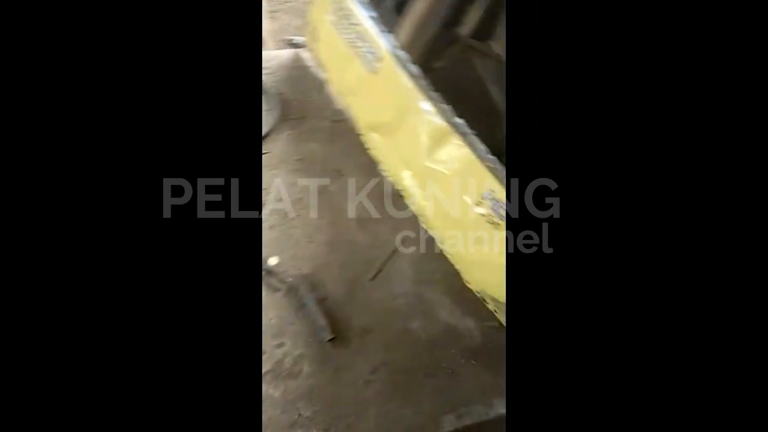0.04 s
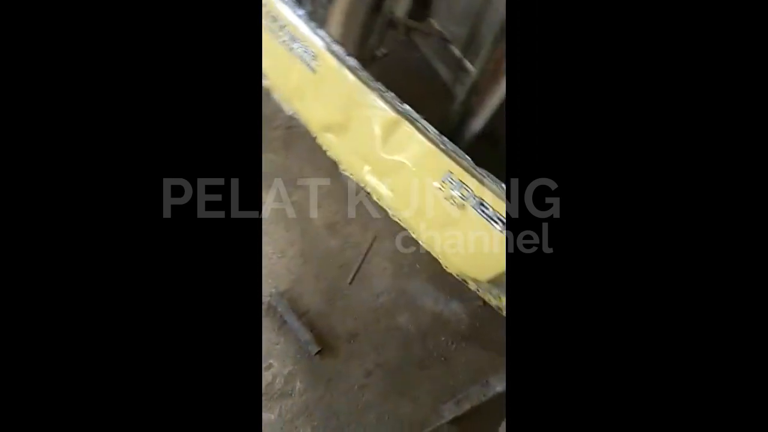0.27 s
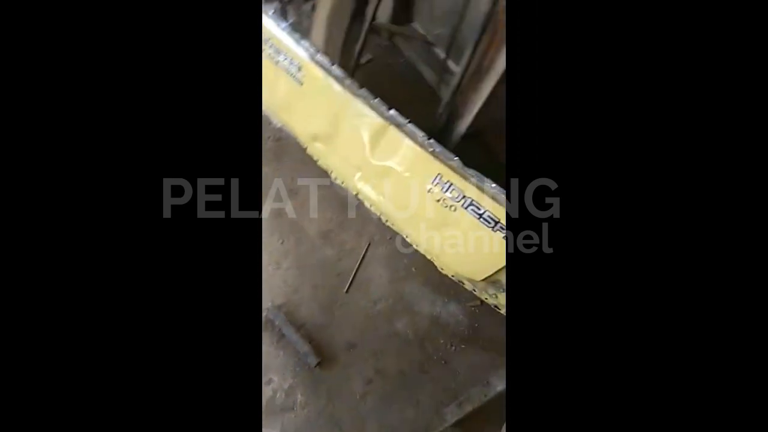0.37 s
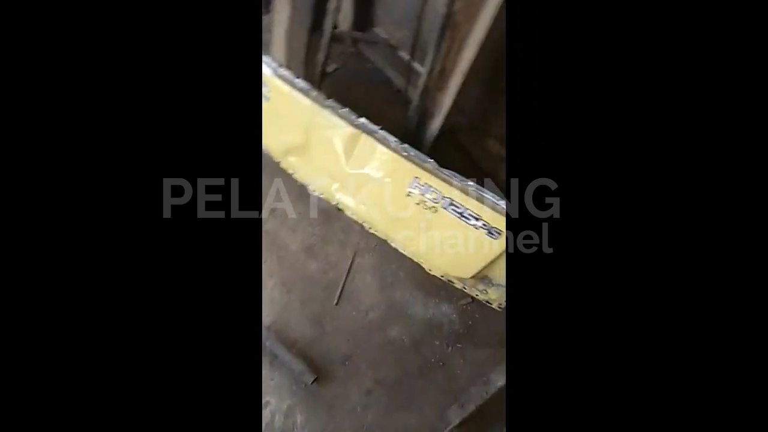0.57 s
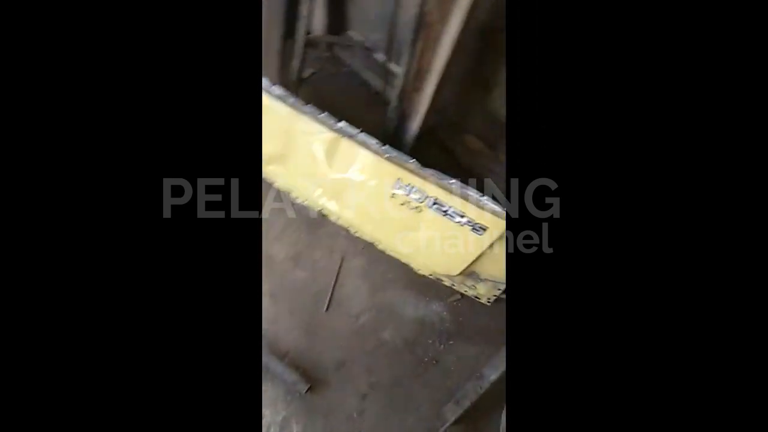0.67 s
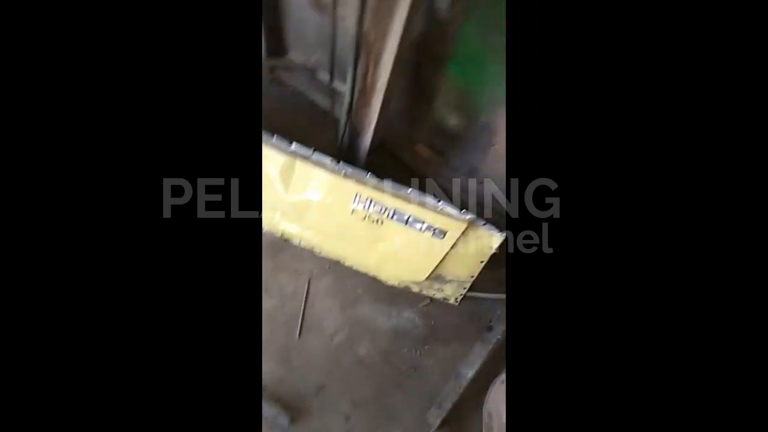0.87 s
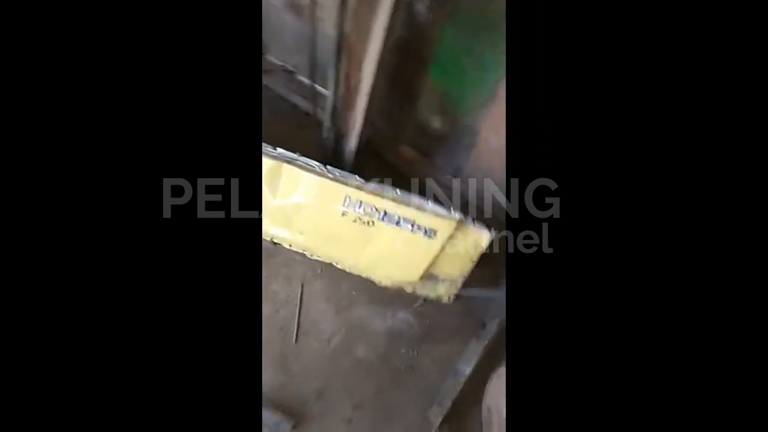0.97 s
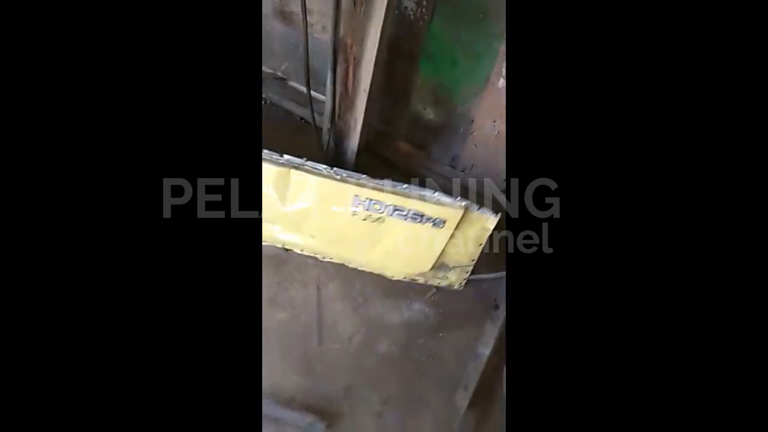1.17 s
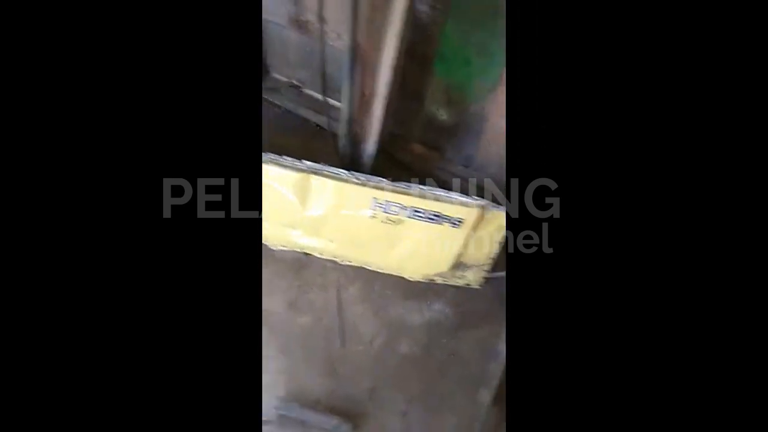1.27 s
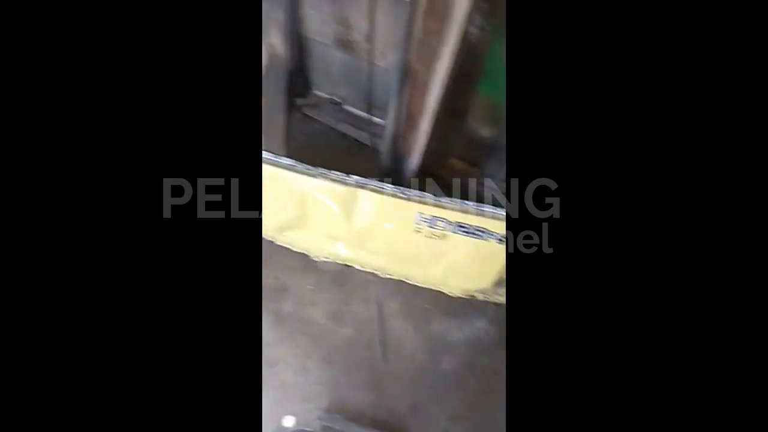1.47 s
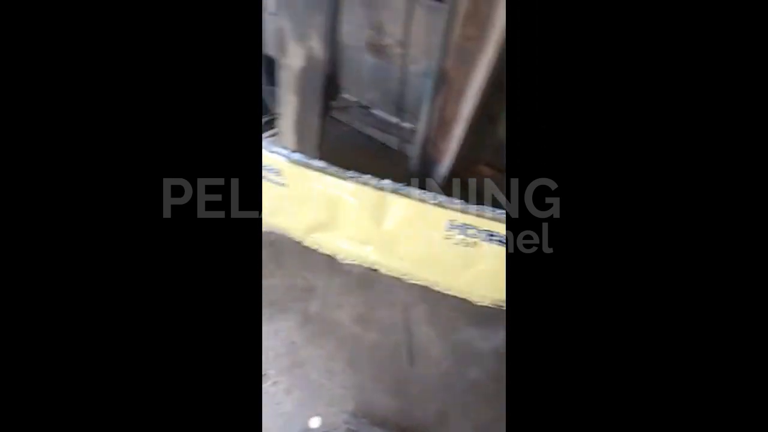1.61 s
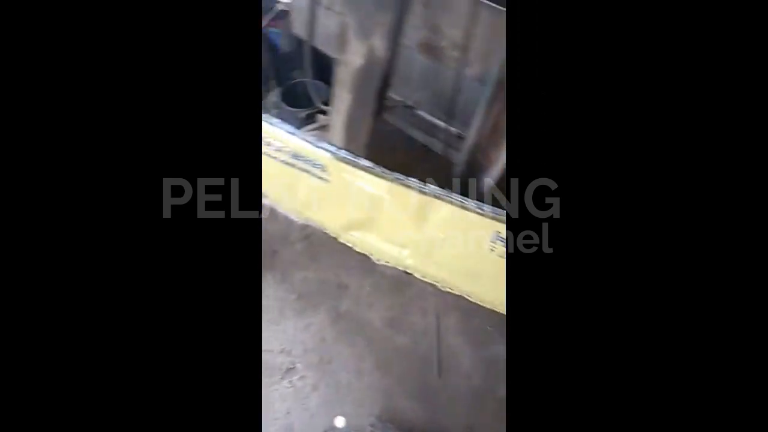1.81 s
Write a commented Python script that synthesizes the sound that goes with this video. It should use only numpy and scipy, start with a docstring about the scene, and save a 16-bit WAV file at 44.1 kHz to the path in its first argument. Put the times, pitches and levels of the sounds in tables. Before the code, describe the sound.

A hammer strikes a big steel truck panel four times at an even pace, heavy and lighter blows in turn, each a sharp crack with a boomy clang, close in a workshop, slightly overloaded microphone.

```python
"""A hammer beats a steel truck panel in a workshop, a heavy blow and a lighter one in turn.
At first an earlier heavy blow rings out, over air noise and a far motor of fading shaft harmonics. Blows follow
at 0.2, 0.6, 1.1 and 1.5 s: a noise-burst knock, a crash of noise bands that swell like crowded sheet modes, and
a boom of low sine modes; the heavy ones hold longer and have more treble. A thin noise-band whine swells
at 0.5 s and again from 1.15 s, two noise scuffs pass after 0.8 s, and a noisy gliding squeal enters at 1.4 s."""
import sys
import numpy as np
from scipy import signal
from scipy.fft import rfft, irfft
from scipy.io import wavfile

SR = 44100
rng = np.random.default_rng(int(sys.argv[2]) if len(sys.argv) > 2 else 0)


def put_to_file(sound):
    """Save the sound as 16-bit audio at rate SR, in the file named by the first command-line argument."""
    columns = np.atleast_2d(sound).T  # one column per channel
    safe = np.clip(columns, -1, 1)
    whole_steps = np.round(safe * 32767)
    wavfile.write(sys.argv[1], SR, whole_steps.astype(np.int16))


N = 81585

# hammer blows: t/s, level/dB, bass/dB, treble/dB, time the sheet keeps shaking/s, lightness (0-1),
# brightness limit f/Hz, knock level/dB
BLOWS = [(-.36, -6, -14, -4.5, 0.008, 0, 12500, -39.5), (.199, 1, 0.5, -4, 0.043, 0.02, 15150, -36),
         (0.593, -1.5, -1.5, -8, 0.0056, 1, 14500, -28.5), (1.104, 2, -0.5, -2.5, 0.032, 0, 15000, -21.5),
         (1.505, -3.5, 0, -15.5, 0.0071, 0.94, 12100, -30.5)]
BANDS_HZ = 31.25 * 2 ** (np.arange(28) / 3)  # third-octave centres
BASS_HZ, TREBLE_HZ, TREBLE_SLOPE = 334, 3353, 3.4  # where a blow's bass and treble columns take over
DIFFUSE_HZ = 570  # the highs reach the ears from all sides


def undb(db):
    """Decibels to gain."""
    return 10 ** (np.asarray(db) / 20)


def rms(x):
    """Root mean square of each channel."""
    return np.sqrt(np.mean(x ** 2, axis=-1, keepdims=True))


def unit(x):
    """Scale to rms 1."""
    return x / rms(x)


def at(table, hz):
    """The columns of a table at one frequency, interpolated over log frequency."""
    rows = np.array(table, float)
    return [np.interp(np.log(hz), np.log(rows[:, 0]), col) for col in rows.T[1:]]


def level(t, table):
    """Gain over time from a table of t/s and level/dB."""
    return undb(np.interp(t, *np.array(table).T))


def freqs():
    """Frequency axis in Hz, kept above zero."""
    return np.maximum(np.arange(N // 2 + 1) * SR / N, 1)


def noise(shape):
    """Two unrelated noises of rms 1 with the given gain over frequency."""
    return unit(irfft(rfft(rng.standard_normal((2, N))) * shape, N))


def third(hz):
    """Third-octave band that overlaps its neighbours."""
    return np.cos(np.pi / 2 * np.clip(3 * np.log2(freqs() / hz), -1, 1))


def peak(hz, width_hz):
    """Steep resonance, 12 dB down half a width from its centre."""
    return 1 / (1 + ((freqs() - hz) / width_hz * 2) ** 2) ** 2


def spread(pair, hz):
    """Mid and side to left and right: nearly alike in the bass, unrelated in the treble."""
    side = np.clip(0.016 + 1 / (1 + (DIFFUSE_HZ / hz) ** 3), 0, 1)
    mid_signal, side_signal = pair
    left_right = mid_signal + np.sqrt(side) * side_signal * np.array([[1], [-1]])
    return left_right / np.sqrt(1 + side)


def add(out, sound, start):
    """Mix a sound in from its start time; one that starts before zero is heard from its middle on."""
    i = int(round(start * SR))
    a, b = max(i, 0), min(N, N + i)
    out[:, a:b] += sound[:, a - i:b - i]


def air():
    """Quiet workshop background: steady noise, shaped band by band."""
    # background spectrum: f/Hz, level per third octave/dB
    floor = [(30, -92.5), (70, -91.5), (150, -91.5), (400, -92), (1000, -80.5), (3000, -93.5), (14000, -90)]
    return sum(undb(at(floor, hz)[0]) * spread(noise(third(hz)), hz) for hz in BANDS_HZ)


def motor(t):
    """Multiples of the shaft rate hum through the resonant housing of a far motor."""
    # motor loudness: t/s, level/dB
    motor_level = [(0, -56.5), (.18, -66.5), (.8, -74), (1.05, -77.5), (1.85, -76)]
    shaft_hz, body_hz, width_hz, low_db = 47.6, 387, 62, -20.5
    out = 0
    for hz in shaft_hz * np.arange(1, 14):
        housing = 1 / (1 + (2 * (hz - body_hz) / width_hz) ** 2)
        gain = housing + undb(low_db)  # a little of every harmonic gets past the resonance
        out = out + gain * np.sin(2 * np.pi * hz * t + rng.uniform(0, 2 * np.pi))
    return unit(out) * level(t, motor_level)


def whine(t):
    """A thin whistle: a narrow noise band that comes and goes."""
    # whine loudness: t/s, level/dB
    whine_level = [(0, -84), (.2, -85), (.5, -68.5), (.75, -68), (.95, -80.5), (1.15, -71), (1.42, -67.5),
                   (1.65, -78.5), (1.85, -83.5)]
    return level(t, whine_level) * noise(peak(4810, 220))


def squeal(t):
    """A high gliding tone, roughened into a narrow band by slow noise that multiplies it."""
    # squeal path: t/s, level/dB, f/Hz
    path = [(1.419, -89, 8300), (1.501, -61, 8560), (1.632, -65, 8460), (1.752, -82.5, 8570),
            (1.81, -63.5, 8200), (1.85, -64, 8180)]
    half_width_hz = 490
    times, db, hz = np.array(path).T
    phase = 2 * np.pi * np.cumsum(np.interp(t, times, hz)) / SR
    tone = np.sqrt(2) * np.sin(phase)
    gain = undb(np.interp(t, times, db)) * (t > times[0])
    return gain * tone * noise(peak(0, 2 * half_width_hz))


def scuffs(t):
    """Light scuffs: soft-edged puffs of broad high noise."""
    # scuffs: t/s, level/dB
    puffs = [(.828, -66), (.866, -68.5)]
    centre_hz, half_width_hz, length_s = 11100, 7100, 0.019
    out = np.zeros((2, N))
    for start, scuff_db in puffs:
        puff = np.exp(-((t - start) / length_s) ** 2)
        out += undb(scuff_db) * puff * noise(peak(centre_hz, 2 * half_width_hz))
    return out


def knocks(t):
    """The short, bright contact of hammer on steel that opens each blow."""
    knock_hz, knock_width_hz, knock_s = 1400, 130, 0.012
    tick_hz, tick_db = 3330, -11.5  # bright edge, relative to the knock
    out = np.zeros((2, N))
    env = t / knock_s * np.exp(1 - t / knock_s)
    for start, *_, knock_db in BLOWS:
        contact = noise(peak(knock_hz, knock_width_hz))
        contact = contact + undb(tick_db) * noise(peak(tick_hz, tick_hz))
        add(out, undb(knock_db) * env * contact, start)
    return out


def strength(hz, db, bass_db, treble_db):
    """How hard a blow drives the sheet at one frequency."""
    bass = bass_db / (1 + (hz / BASS_HZ) ** 2)
    treble = treble_db / (1 + (TREBLE_HZ / hz) ** TREBLE_SLOPE)
    return undb(db + bass + treble)


def fade(age, hold, t60):
    """Hold, then exponential decay by 60 dB in t60."""
    return np.exp(-np.log(1000) * np.maximum(age - hold, 0) / t60)


def ring_time(hz, t60, light):
    """Heavy blows keep the sheet going longer, above all its low modes."""
    light_ring, bass_ring = 0.33, 0.29  # how much faster a light blow dies: throughout, and extra in the bass
    return t60 * np.exp(-light * (light_ring + bass_ring / (1 + (hz / BASS_HZ) ** 4)))


def slaps(t):
    """A low slap, one brief sine burst, follows the crack of each blow."""
    delay_s, slap_hz, width_s, slap_db = 0.028, 340, 0.0018, -8
    out = np.zeros((2, N))
    late = t - delay_s
    slap = undb(slap_db) * np.exp(-(late / width_s) ** 2) * np.sin(2 * np.pi * slap_hz * late)
    for start, blow_db, *_ in BLOWS:
        add(out, np.array([slap, slap]) * undb(blow_db / 2), start)
    return out


def boom(t):
    """The panel's strong modes, decaying sines, build up and ring on after each blow."""
    # panel modes before each blow's own strength: f/Hz, heavy-blow level/dB, light-blow level/dB, t60/s
    modes = [(111.35, -32.5, -40, 0.74), (126.2, -30.5, -26, 0.58), (187.2, -25.5, -31, 0.66),
             (198.9, -26, -20.5, .48), (240.9, -21, -21.5, 0.55), (253.5, -14.5, -26.5, .4),
             (271.5, -17, -30, 0.51), (286.3, -29, -21.5, 0.49), (304, -23.5, -18.5, .42),
             (326.4, -30.5, -27, 0.78), (356.3, -26.5, -20.5, 0.69), (401, -21, -20, 0.46),
             (415.4, -22.5, -16.5, 0.44), (463, -32, -28, 0.16), (490.8, -27, -34, .6),
             (544.8, -21, -30.5, 0.4), (601.6, -27.5, -34.5, .45), (650.8, -18.5, -22, 0.26),
             (706, -26.5, -27.5, 0.54), (747, -28.5, -17.5, 0.38), (1035, -28.5, -36, 0.48),
             (1095, -31, -37.5, 0.21), (1363, -30.5, -32, .36), (1432, -28, -32, 0.41),
             (1750, -32, -40.5, 0.15), (2014, -36, -33, 0.41)]
    hold_share = 0.77  # share of the shaking time
    spread_rad = 0.74  # phase between the channels at 500 Hz
    step_rad = 1.601  # each mode leads the one below: they fall into step after the crack
    rise_s, rise_hz = 0.025, 710  # build-up time of the lowest modes; it halves at rise_hz
    out = np.zeros((2, N))
    for k, (hz, heavy_db, light_db, t60) in enumerate(modes):
        lag = (-1) ** k * min(spread_rad * hz / 500, np.pi / 2) * np.array([[.5], [-.5]])
        build_up = 1 - np.exp(-(t / (rise_s / (1 + hz / rise_hz))) ** 2)
        wave = build_up * np.sin(2 * np.pi * hz * t + k * step_rad + lag)
        for start, blow_db, bass_db, treble_db, hold, light, _, _ in BLOWS:
            mode_db = heavy_db + light * (light_db - heavy_db)
            gain = undb(mode_db) * strength(hz, blow_db, bass_db, treble_db)
            add(out, gain * wave * fade(t, hold_share * hold, ring_time(hz, t60, light)), start)
    return out


def uneven_gain():
    """Uneven random gain over frequency: fine ripple throughout, broader ripple in the treble."""
    f = freqs()
    fine = np.interp(f / 22, np.arange(4096), rng.standard_normal(4096))  # a new value every 22 Hz
    broad = np.interp(f / 110.8, np.arange(512), rng.standard_normal(512))  # and every 110.8 Hz
    return undb(0.5 * fine) * undb(4 * broad * f / (f + TREBLE_HZ))


def crash(t):
    """Crowded modes swell as bending waves fill the sheet, hold while it shakes, and die into the room."""
    # crowded modes before each blow's own strength: f/Hz, level per third octave/dB, t60/s, swell time/s
    sheet = [(40.3, -65.5, .7, .02), (76, -43, .7, 0.069), (115, -33.5, .72, .025),
             (218, -31.5, 0.87, 0.0073), (390, -24.5, .56, 0.06), (760, -24, 0.48, 0.0037),
             (1000, -25, 0.43, 0.0073), (1400, -24.5, 0.36, .009), (1970, -28.5, 0.37, 0.015),
             (4840, -31.5, 0.37, 0.013), (11880, -24, 0.29, .013), (12900, -25, 0.36, 0.0074),
             (16020, -35, .13, 0.0093)]
    # the room's late tail: f/Hz, level relative to the crash/dB
    room = [(100, -48.5), (250, -42), (450, -35.5), (1200, -38.5), (4000, -36), (12000, -48.5)]
    room_t60_s = 1
    first_crack = 0.69  # share of the swell that is there at once in the treble; less in the bass
    crack_s, soft_contact_s = 0.0023, 0.0074  # rise time; extra rise time of a light blow
    same_below_hz = 1080  # the lows ring alike on every blow
    ripple = uneven_gain()
    rings = np.zeros((len(BLOWS), 2, N))
    for hz in BANDS_HZ:
        db, t60, swell = at(sheet, hz)
        shape = third(hz) * ripple
        common = noise(shape)
        same = 1 / (1 + (hz / same_below_hz) ** 2)
        filling = 1 - (1 - first_crack * hz / (hz + BASS_HZ)) * np.exp(-(t / swell) ** 2)
        for ring, (_, blow_db, bass_db, treble_db, hold, light, _, _) in zip(rings, BLOWS):
            tail = undb(at(room, hz)[0]) * fade(t, hold, room_t60_s)
            attack = filling * np.minimum(t / (crack_s + light * soft_contact_s), 1)
            env = attack * (fade(t, hold, ring_time(hz, t60, light)) + tail)
            source = np.sqrt(same) * common + np.sqrt(1 - same) * noise(shape)
            band = unit(spread(source, hz) * env) * rms(env)  # chance swings do not alter the band's level
            ring += band * undb(db) * strength(hz, blow_db, bass_db, treble_db)
    out = np.zeros((2, N))
    for ring, (start, *_, top_hz, _) in zip(rings, BLOWS):
        low_pass = signal.butter(10, top_hz, fs=SR, output="sos")
        add(out, signal.sosfilt(low_pass, ring), start)
    return out


def scene():
    """The hammered panel in its workshop."""
    t = np.arange(N) / SR
    background = air() + motor(t) + whine(t) + squeal(t) + scuffs(t)
    return background + knocks(t) + slaps(t) + boom(t) + crash(t)


def record(dry):
    """The recorder rounds the highest peaks towards a ceiling and cuts the top."""
    ceiling, top_hz = 0.68, 15900
    rounded = dry / (1 + (dry / ceiling) ** 4) ** .25
    return signal.sosfilt(signal.ellip(10, .2, 80, top_hz, fs=SR, output="sos"), rounded)


dry = scene()
out = record(dry)
put_to_file(out)
```